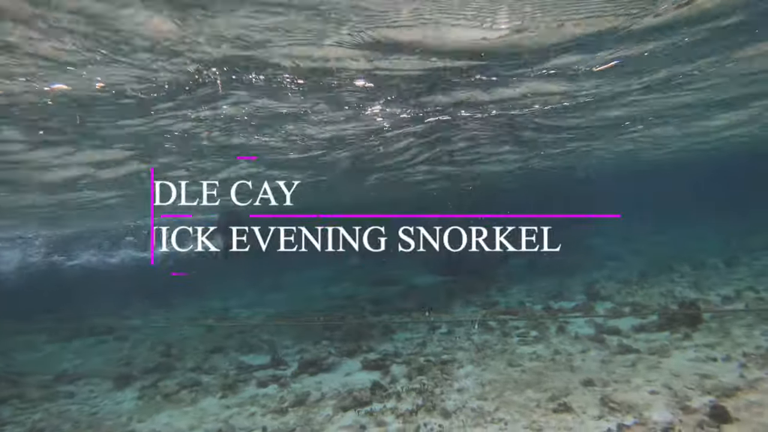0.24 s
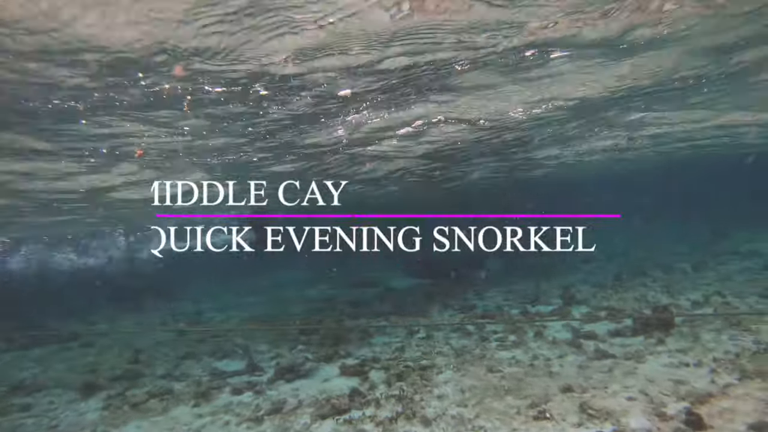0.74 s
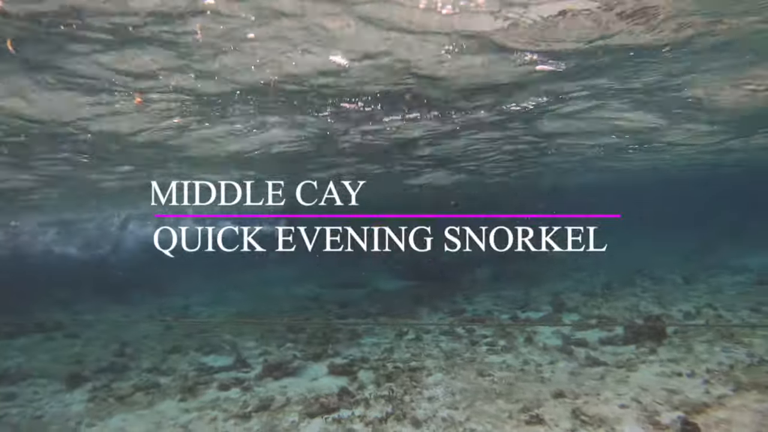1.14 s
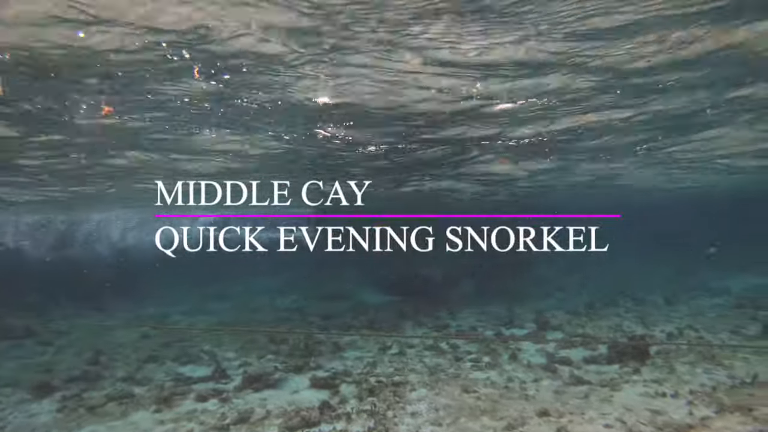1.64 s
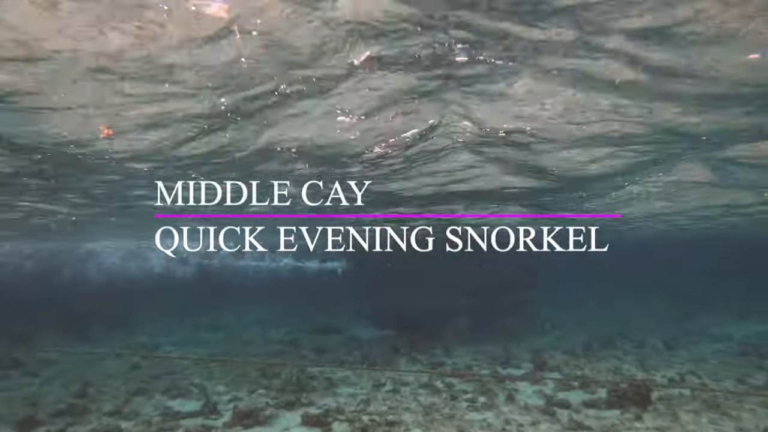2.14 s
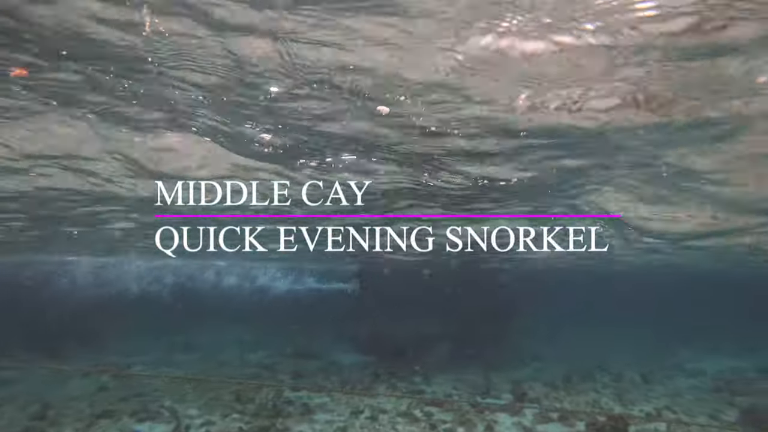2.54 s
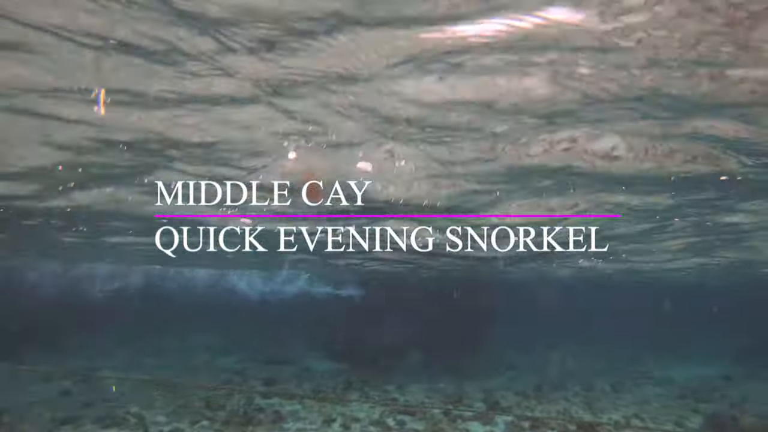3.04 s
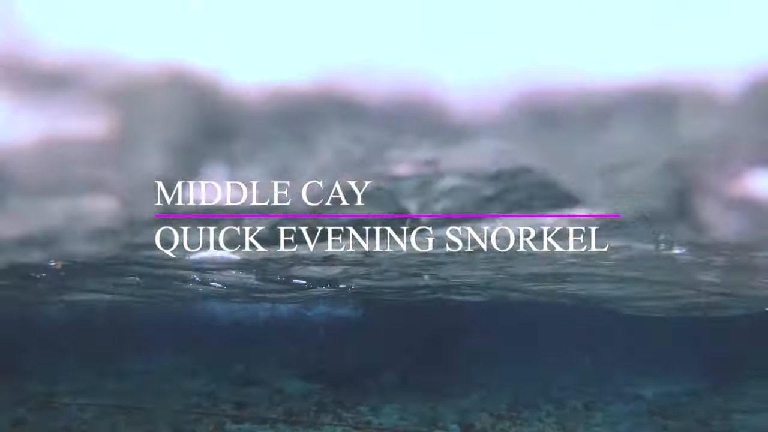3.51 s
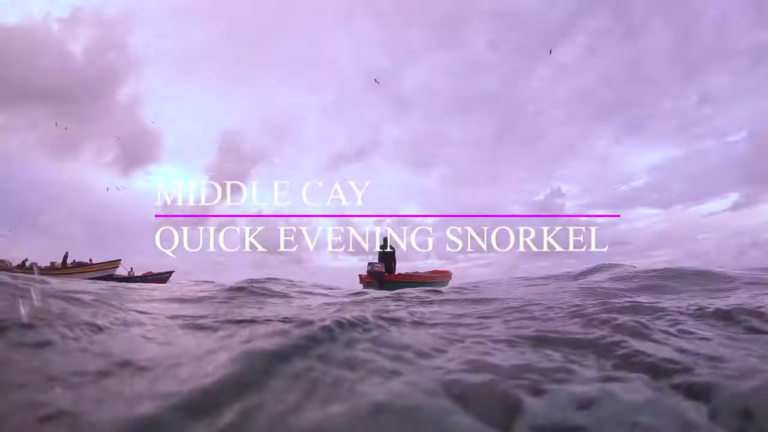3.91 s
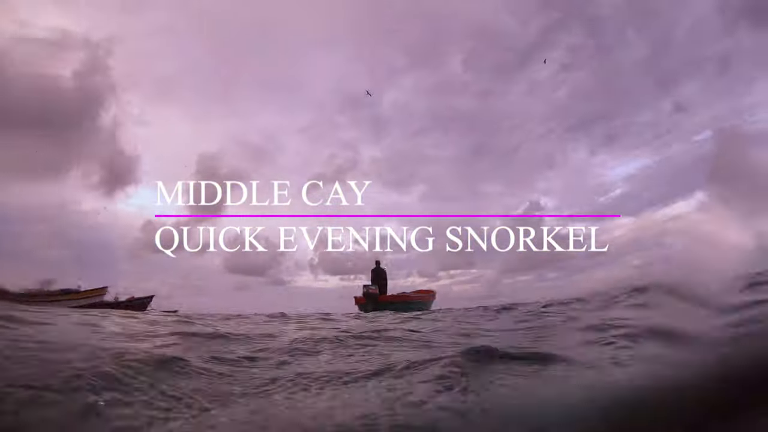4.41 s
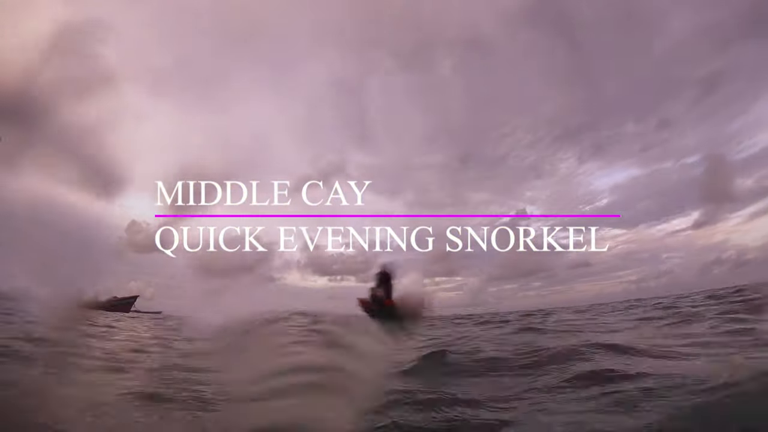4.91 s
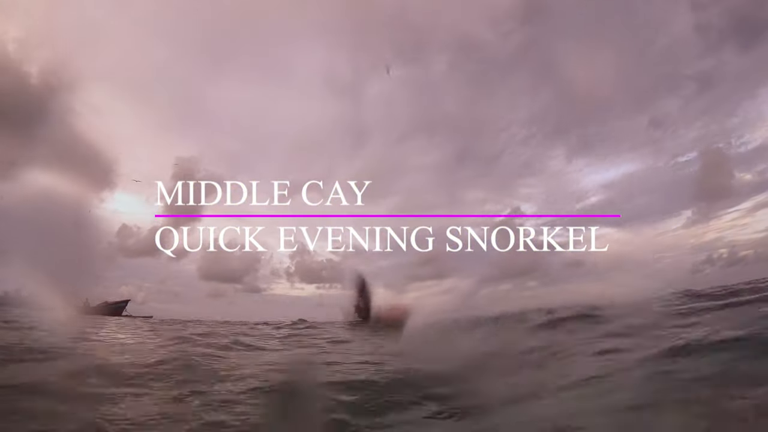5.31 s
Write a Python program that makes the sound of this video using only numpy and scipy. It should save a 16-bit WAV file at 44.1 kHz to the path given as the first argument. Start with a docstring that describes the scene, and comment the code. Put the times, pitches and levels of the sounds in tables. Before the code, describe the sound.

Uneven underwater rattle of an idling boat motor gives way to a gurgling splash, lapping water and hollow putting.

```python
"""Under water beside a small outboard motor, in a camera housing whose ringing pitches shift and waver.
The motor idles unevenly: each firing blows exhaust bubbles whose collapse excites the housing's modes.
The camera rises and breaks the surface: air gurgles out of the housing, water slaps, drips and thuds
on it and its two microphone ports, and the motor putts on through the air, ringing its exhaust pipe."""
import sys
import numpy as np
from scipy import signal
from scipy.fft import rfft, irfft, next_fast_len
from scipy.io import wavfile
from scipy.ndimage import uniform_filter1d, map_coordinates

SR = 44100
rng = np.random.default_rng(int(sys.argv[2]) if len(sys.argv) > 2 else 0)


def write(x):
    x = np.atleast_2d(x).T
    wavfile.write(sys.argv[1], SR, np.round(np.clip(x, -1, 1) * 32767).astype(np.int16))


N = 245151
TIME = np.arange(N) / SR
SURFACE_S = 3.177  # the housing breaks the surface


def amp(db):
    """Amplitude ratio of a level in dB."""
    return 10 ** (np.asarray(db) / 20)


def unit(x):
    """Normalisation to rms 1."""
    return x / np.sqrt(np.mean(x ** 2) + 1e-20)


def curves(rows):
    """Linear interpolation to one value per sample, for each column after the time."""
    s, *cols = np.transpose(rows)
    return [np.interp(TIME, s, c) for c in cols]


def wobble(rate):
    """Smooth random modulation, rate knots a second."""
    return map_coordinates(rng.standard_normal(int(N * rate / SR) + 4), [TIME * rate])


def filtered(x, response):
    """Linear filtering at unit power gain, so only relative levels in the response count."""
    m = next_fast_len(N + SR // 2)
    h = response(np.fft.rfftfreq(m, 1 / SR))
    return irfft(rfft(x, m) * unit(np.abs(h)) * np.exp(1j * np.angle(h)), m)[..., :N]


def modes(table):
    """Modal superposition of squared resonances; neighbours oppose, which darkens the valleys."""
    return lambda f: sum((-1) ** k * amp(db) * (1j * f * w / (c * c - f * f + 1j * f * w)) ** 2
                         for k, (c, w, db) in enumerate(table))


def colour(points):
    """Spectral envelope through (frequency [Hz], level [dB]) points on a log axis."""
    hz, db = np.transpose(points)
    return lambda f: amp(np.interp(np.log(f + 1), np.log(hz + 1), db))


def noise(side_spectrum):
    """Partly coherent stereo noise: a white sum and a difference with the given spectrum."""
    m = next_fast_len(N)
    mid, side = rng.standard_normal((2, m))
    side = irfft(rfft(side) * colour(side_spectrum)(np.fft.rfftfreq(m, 1 / SR)), m)
    return np.array([mid + side, mid - side])[:, :N]


def patchy(x, db, bins, frames):
    """Random spectral modulation: the colour changes in patches of frequency and time."""
    z = signal.stft(x, nperseg=256)[2]
    field = uniform_filter1d(rng.standard_normal(z.shape[1:]), size=bins, axis=0)
    field = uniform_filter1d(field, size=frames, axis=1)
    return unit(signal.istft(z * amp(db * unit(field)), nperseg=256)[1][:, :N])


def bursts(times, db, rise, t60, delay=0):
    """Incoherent addition: envelopes jump up at each time and decay, and their energies add."""
    t = np.arange(SR // 4) / SR
    energy = np.bincount(((times + delay) * SR).astype(int).clip(0), amp(db) ** 2, N)[:N]
    shape = amp(-60 * t / t60) * (1 - np.exp(-t / rise))
    return np.sqrt(np.abs(signal.fftconvolve(energy, shape ** 2)[:N]))


def kicks(times, db):
    """A train of pressure impulses."""
    return np.bincount((times * SR).astype(int).clip(0), amp(db), N)[:N]


def sides(db):
    """Left and right gains of a level difference."""
    return amp(np.array([db, -db]) / 2)


def shifting(x, tables, times, wander):
    """Equal-power crossfade from one set of modes to the next, wandering between them."""
    stage = np.interp(TIME, times, np.arange(len(tables))) + wander * wobble(14)
    stage = stage.clip(0, len(tables) - 1)
    return sum(np.sqrt(np.clip(1 - np.abs(stage - k), 0, 1)) * filtered(x, modes(table))
               for k, table in enumerate(tables))


# Strong firings; the last three columns are relative to the crackle:
# (time [s], crackle [dB], thump [dB], second clack [dB], brightness [dB])
FIRINGS = [(0.0206, -13.5, -3.5, 1.5, 6.5), (0.048, -12.5, -1.5, 2.5, -6), (0.079, -25, 7, 2, 3),
           (0.1063, -18, -20, 4.5, -12), (0.208, -16.5, -9, 2.5, -3), (0.2376, -13, 0, 5, -1.5),
           (0.269, -16.5, -5, 0.5, -7), (0.3292, -13.5, -1, 4, -7), (0.3613, -17, -17, -2.5, 3),
           (0.4221, -18, 1.5, 0.5, 1.5), (0.4564, -19.5, -8, -1, -6), (0.523, -16, -0.5, 4, 1),
           (0.556, -20, -9, 0.5, 2.5), (0.616, -11.5, -3, -6, 8), (0.6716, -22.5, -9, 3, 2),
           (0.7016, -15.5, -3, -11.5, 10.5), (0.7271, -22.5, -9, 3, 8), (0.844, -12, -7, -5.5, 6),
           (0.8886, -21, 0, -13, -0.5), (0.9246, -16.5, -3, 3.5, -3), (0.9543, -18, -12, -1.5, 3),
           (1.0008, -26, -17, 8, -6), (1.07, -17.5, -2.5, 1, 0), (1.106, -21.5, -2, -1, 2.5),
           (1.165, -16.5, -6, -2.5, 5), (1.1926, -17, -8, -13.5, 1.5), (1.3121, -17, -25, -12, 3.5),
           (1.342, -12.5, -7, -5, 0.5), (1.4259, -16.5, 1.5, 1.5, 0.5), (1.4627, -16, -34, -5.5, 0.5),
           (1.5158, -17, -2, -1, 4), (1.544, -15, -6, -18, -1.5), (1.6665, -14.5, -7.5, -1, 6),
           (1.7501, -15.5, -11, -3.5, -0.5), (1.775, -20, -27, -8, 3), (1.8941, -17, -5, 0, 1.5),
           (1.9814, -18.5, -3.5, -4, 8.5), (2.098, -22, -9, -1.5, -8), (2.131, -18, -8, 1, 3.5),
           (2.2159, -22, -11, 1, 7.5), (2.2426, -26, -2, 0.5, 5.5), (2.2941, -23.5, -6, -15, 2),
           (2.3578, -18, -7, 0.5, 2.5), (2.39, -19.5, -9, -14.5, 4), (2.4491, -22.5, 0, 0.5, 12),
           (2.476, -19.5, -8, -9.5, 1.5), (2.5372, -17.5, -7, -18, -1), (2.596, -24, -4, -10, 1),
           (2.6269, -20, -0.5, 1, 3), (2.662, -24, -1, -8, 3.5), (2.719, -16, -7.5, -1.5, 8.5),
           (2.8, -20.5, -5, -6, -1), (2.92, -27, -36, -16, 9), (2.985, -23.5, -3.5, -2, 10.5),
           (3.0723, -24, -4.5, -1, 9), (3.29, -38.5, 7, 5, 18), (3.3814, -32, -13, 2, 6.5)]
TURN_S, TURN_SCATTER_S = 0.025, 0.0016  # one turn of the crank


def firings():
    """Quasi-periodic excitation: up to four weaker firings follow each strong one, a turn apart."""
    s, db, thump_db, second_db = np.transpose(FIRINGS)[:4]
    turn = np.arange(1, 5)
    late, size = np.moveaxis(rng.standard_normal((len(s), len(turn), 2)), 2, 0)
    weak_s = s[:, None] + TURN_S * turn + TURN_SCATTER_S * late
    weak_db = db[:, None] - 9 - 1.5 * (turn - 1) + 3 * size
    next_strong_s = np.append(s[1:], s[-1] + 3 * TURN_S)
    free = s[:, None] + TURN_S * (turn + .5) < next_strong_s[:, None]
    return (np.append(s, weak_s[free]), np.append(db, weak_db[free]),
            np.append(thump_db, np.full(free.sum(), -6.5)),
            np.append(second_db, np.full(free.sum(), -4)))


def brightened(x, above_hz=2870, decay_s=0.027):
    """Modal balance: each strong firing excites the upper resonances more or less than the lower."""
    s, bright_db = np.transpose(FIRINGS)[[0, 4]]
    last = (np.searchsorted(s, TIME + 0.0034) - 1).clip(0)
    gain = amp(bright_db[last] * np.exp(-np.abs(TIME - s[last]) / decay_s))
    upper = signal.sosfiltfilt(signal.butter(2, above_hz, "high", fs=SR, output="sos"), x)
    return x + (uniform_filter1d(gain, size=40) - 1) * upper


# Housing modes, deep, midway and near the surface: (frequency [Hz], bandwidth [Hz], level [dB])
DEEP_MODES = [(1292, 39, -10), (1512.5, 93, 5.5), (1730, 280, -18), (1970, 99, -14), (2120, 115, -6),
              (2402, 210, -15), (2645, 110, -18.5), (2820, 160, -17), (3140, 303, -13.5),
              (4110, 290, -25.5), (4500, 260, -24), (4910, 220, -25), (5500, 480, -38)]
MIDWAY_MODES = [(1325, 42, -13.5), (1578, 71, 2), (1916, 170, -23), (2223, 153, -5.5), (2743, 170, -13.5),
                (2933, 170, -7.5), (3213, 264, -12.5), (4060, 210, -28.5), (4490, 130, -20.5),
                (5780, 110, -35)]
SHALLOW_MODES = [(1098, 72, -5), (1529, 95, 11), (1754, 108, 3), (2053, 310, -6), (2427, 130, -1),
                 (2685, 173, -0.5), (3208, 435, -4.5), (4160, 400, -17.5), (4807, 270, -16.5),
                 (5615, 530, -26.5)]
# Transmission of the wall above its resonances: (frequency [Hz], level [dB])
WALL_TREBLE = [(4500, -15), (5800, -8), (8000, -10), (15000, -24)]
# Incoherent difference of the motor's sound at the ports, against the sum: (frequency [Hz], level [dB])
MOTOR_SIDE = [(60, -6), (300, -33.5), (900, -1.5), (3310, -8.5)]


def crackle(s, db, second_db, churn):
    """Bubble collapse excites the housing's modes; every firing clacks twice."""
    second_s = s + 0.0094 + 0.0008 * rng.standard_normal(len(s))
    clack_s, clack_db = np.append(s, second_s), np.append(db, db + second_db)
    snap = bursts(clack_s, clack_db - 6.5, rise=0.00053, t60=0.041, delay=-0.0012)  # sudden collapse
    edge = bursts(s, db - 19, rise=0.00051, t60=0.013)  # a faint, very short fizz on each attack
    clumps = amp(2.5 * np.tanh(wobble(300)))
    strength = clumps * np.sqrt(snap ** 2 + edge ** 2 + churn ** 2)
    knock = 4.5 * kicks(clack_s - .0007, clack_db) * np.array([[.75], [1]])  # the firing itself
    drive = strength * patchy(noise(MOTOR_SIDE), 2.0, bins=3, frames=7) + knock
    ring = shifting(drive, [DEEP_MODES, MIDWAY_MODES, SHALLOW_MODES], (0.66, 1.55, 2.2), wander=0.3)
    sizzle = amp(-30) * filtered(strength * noise(MOTOR_SIDE), colour(WALL_TREBLE))
    return brightened(ring + sizzle)


# Response of the housing's body: (frequency [Hz], level [dB])
BODY_SPECTRUM = [(100, -7), (170, -0.5), (241, -7.5), (323, -23.5), (451, -28), (499, -5), (570, 9),
                 (657, 4.5), (1180, -22), (1620, -35.5), (2750, -120)]


def housing_body(s, db, churn):
    """Forced vibration: the housing's body answers each firing and hums with the churn."""
    envelope = np.hypot(bursts(s, db, rise=0.0045, t60=0.063, delay=0.0071), churn)
    drive = noise(MOTOR_SIDE) * envelope + 5 * kicks(s + 0.00591, db)
    return filtered(drive, colour(BODY_SPECTRUM))


# Exhaust bubble modes, an early and a lower late set: (frequency [Hz], bandwidth [Hz], level [dB])
THUMP_MODES = [
    [(127.5, 61, -11), (144.6, 19.3, 5.5)],
    [(119, 30.7, 0.5), (160.4, 35, -6.5)],
]


def thump(s, db, churn):
    """Bubble pulsation: the exhaust gives a low thump just after each firing."""
    push = 14 * kicks(s + 0.0102, db) + churn * noise([(100, -33)])
    return shifting(push, THUMP_MODES, times=(0.89, 1.1), wander=0.84)


# Paths to the ports: (frequency [Hz], left minus right [dB], phase lead of the left [rad])
WALL_PATHS = [(600, -0.2, -0.027), (1550, -4.5, -0.098), (2200, 1, -0.34), (3100, -1, -0.43), (4500, -1, 1)]


def through_walls(x):
    """Transmission through a different wall to each port gives differences of level and phase."""
    m = next_fast_len(N)
    hz = np.fft.rfftfreq(m, 1 / SR)
    f, db, lead = np.transpose(WALL_PATHS)
    gain = sides(np.interp(hz, f, db)) * np.exp(.5j * np.outer([1, -1], np.interp(hz, f, lead)))
    return irfft(rfft(x, m) * gain / np.abs(gain.mean(0)), m)[:, :N]


# Churn of the exhaust between firings: (time [s], crackle [dB], body [dB], thump [dB])
CHURN = [(0.0, -35, -37, -31), (2.47, -40, -41, -48.5), (3.6, -47.5, -51.5, -39.5)]


def motor_under_water():
    """Waterborne sound: each firing gives a crackle, the ring of the housing's body, then a thump."""
    s, db, thump_db, second_db = firings()
    body_db = db - 6 + 4 * wobble(39.8)[(s * SR).astype(int)]
    submerged = np.clip((SURFACE_S + 0.43 - TIME) / 0.2, 0, 1)
    hiss, hum, low = submerged * amp(curves(CHURN))
    housing = crackle(s, db, second_db, hiss) + housing_body(s, body_db, hum)
    return through_walls(housing) + thump(s, db + thump_db, low)


# Water moving on the ports: (time [s], rumble [dB], slosh [dB])
FLOW = [(0, -46.5, -85), (1.2, -42, -66), (3.3, -45, -76), (3.35, -38.5, -33), (3.6, -34, -37),
        (3.75, -34, -46.5), (4.0, -38.5, -46.5), (4.25, -34, -40.5), (4.5, -38, -45.5), (5.0, -41.5, -50.5),
        (5.3, -30.5, -42.5), (5.56, -35, -47.5)]
# Short surges on the submerged ports: (time [s], level [dB])
SURGES = [(2.088, -36), (2.48, -40), (2.558, -36.5)]
# Spectra of the flow: (frequency [Hz], level [dB])
RUMBLE_SPECTRUM = [(15, -15), (27, -12), (43, -4), (81, -9.5), (110, -5), (140, -9), (240, -120)]
SLOSH_SPECTRUM = [(60, -21.5), (150, -3), (250, -3), (450, -7), (700, -26.5), (2000, -54.5)]


def water_flow():
    """Flow noise: rumble and lumpy slosh differ from port to port; surges lift both."""
    rumble_db, slosh_db = curves(FLOW)
    surge = bursts(*np.transpose(SURGES), rise=0.0023, t60=0.32)
    rumble = filtered(noise([(40, -6.5)]), colour(RUMBLE_SPECTRUM))
    slosh = filtered(noise([(250, -3)]) * amp(5.4 * wobble(50)), colour(SLOSH_SPECTRUM))
    return np.hypot(amp(rumble_db), amp(6.5) * surge) * rumble + np.hypot(amp(slosh_db), surge) * slosh


def bubble_tones(rows, attack, rough, splash_db=-12.5):
    """Damped oscillators that glide and quiver; rows as in DRIPS, plus left minus right [dB]."""
    out, t = np.zeros((2, N + SR)), np.arange(SR // 8) / SR
    quiver, size = np.pad(wobble(150), (0, SR)), np.pad(wobble(200), (0, SR))
    for s, db, hz, glide, t60, pan_db in rows:
        at = slice(round(s * SR), round(s * SR) + len(t))
        bend = 1 + glide * np.minimum(2 * t / t60, 1) + 0.056 * rough * quiver[at]
        phase = 2 * np.pi * hz * np.cumsum(bend) / SR
        flutter = 1 + rough * size[at] * np.minimum(t / 0.0063, 1)
        ring = amp(db - 60 * (t / t60) ** 1.018) * flutter * np.sin(phase)
        # water torn open around the bubble: a band of noise at its pitch
        torn = signal.fftconvolve(rng.standard_normal((2, len(t))), [np.hanning(70)], "same", axes=1)
        band = (unit(torn) * [np.sin(phase), np.cos(phase)]).sum(0)
        splash = amp(db + splash_db - 60 * t / 0.036) * band
        onset = (1 - np.exp(-t / attack)) ** 2
        out[:, at] += sides(pan_db)[:, None] / sides(pan_db).mean() * (ring + splash) * onset
    return out[:, :N]


# Bubbles and drips: (time [s], level [dB], frequency [Hz], glide [fraction], decay by 60 dB [s])
DRIPS = [(2.503, -29, 333, -0.73, 0.092), (2.573, -22, 588, -0.15, 0.17), (2.699, -23, 400, 0.059, 0.03),
         (3.334, -20.5, 1026, 0.064, 0.015), (3.352, -24, 630, 0.057, 0.045),
         (3.456, -24, 2480, -0.12, 0.036), (3.472, -17, 637, 0.19, 0.064),
         (3.582, -22.5, 663, -0.043, 0.045), (3.623, -23, 663, 0.16, 0.08),
         (3.741, -28.5, 700, -0.041, 0.073), (3.969, -12.5, 1780, 0.54, 0.0055),
         (4.134, -26.5, 3290, -0.014, 0.024), (4.159, -28.5, 3180, 0.0021, 0.022),
         (4.183, -28, 724, 0.057, 0.097), (4.262, -10.5, 1635, -0.33, 0.0356),
         (4.279, -17.5, 1365, -0.15, 0.043), (4.276, -15, 3140, 0.22, 0.02),
         (4.371, -45, 8100, -0.026, 0.093), (4.468, -21, 836, 0.015, 0.11), (5.24, -29, 829, 0.053, 0.075),
         (5.291, -3, 1920, -0.12, 0.0096), (5.317, -18, 1113, 0.24, 0.013), (5.3295, 1.5, 1680, 0.1, 0.012),
         (5.347, -29, 2300, 0.01, 0.036), (5.366, -36, 1460, 0.5, 0.043)]
DRAINED_S, FILM_PAN_DB = 3.7, 22  # from surfacing until the ports drain, a drip is heard on one of them


def drips(droplets=8, spread_octaves=0.8, left_db=0.5):
    """Bubble resonance: each drip rings, then droplets spatter back at nearby pitches."""
    late, pitch, size = np.moveaxis(rng.random((len(DRIPS), droplets, 3)), 2, 0)
    s, db, hz = np.transpose(DRIPS)[:3, :, None]
    spatter_s = s + 0.014 * (0.44 + late)
    spatter_db = db - 31 - 6 * size - 8 * late
    spatter_hz = hz * 2 ** (spread_octaves * (2 * pitch - 1))
    spatter = [(*row, .15, 0.012, left_db)
               for row in zip(spatter_s.ravel(), spatter_db.ravel(), spatter_hz.ravel())]
    draining = (s > SURFACE_S) & (s < DRAINED_S)
    pan_db = np.where(draining, FILM_PAN_DB * np.sign(pitch[:, :1] - .5), left_db).ravel()
    drops = [(*drip, pan) for drip, pan in zip(DRIPS, pan_db)]
    return bubble_tones(drops + spatter, attack=0.00046, rough=0.25, splash_db=-19)


# Wash between spurts: (time [s], low band [dB], ring [dB], spray [dB])
WASH_LEVELS = [(3.4, -40.5, -54.5, -94), (4.0, -56, -54.5, -96), (4.08, -64, -65, -100),
               (4.6, -57.5, -67.5, -74), (4.78, -56, -73.5, -89), (5.56, -52, -63, -94.5)]
# Water spurting past the housing: (time [s], level [dB], relative spray level [dB])
SPURTS = [(4.108, -44, -32), (4.22, -46, -14.5), (4.349, -47.5, -13), (4.799, -54.5, -16), (5.17, -51, -30),
          (5.45, -63, -38)]
# Housing modes in air: (frequency [Hz], bandwidth [Hz], level [dB])
AIR_MODES = [(1870, 90, 10.5), (3104, 610, 9), (4670, 380, 2.5), (7280, 510, -13.5)]
# Spectra of the low band and the spray: (frequency [Hz], level [dB])
WASH_SPECTRUM = [(500, -10), (1700, -8.5), (2150, -10), (2600, -19.5), (4000, -34), (6000, -47.5)]
SPRAY_SPECTRUM = [(5000, -43), (6000, -3), (7300, 3), (10000, -1.5), (14000, -10.5)]


def wash(tick_spacing_s=0.022):
    """Modulated noise: the surface wash swells with each putt; wash and motor ticks ring the housing."""
    at, spurt_db, spray_db = np.transpose(SPURTS)
    spurts = [bursts(at, spurt_db + db, rise=0.013, t60=0.6) for db in (0, -3, spray_db)]
    low_gain, ring_gain, spray_gain = np.hypot(amp(curves(WASH_LEVELS)), spurts)
    putt_s, putt_db = np.transpose(PUTTS)[:2]
    swell = 1 + bursts(putt_s, putt_db + 31, rise=0.0012, t60=0.069)
    tick_s = np.arange(SURFACE_S, N / SR, tick_spacing_s)
    late, size = rng.standard_normal((2, N // 500))[:, :len(tick_s)]
    ticks = kicks(tick_s + 0.0046 * late, 26.5 + 4 * size)
    grain_db = 3 * wobble(22) + 3 * wobble(250)
    low_noise = swell * amp(grain_db) * patchy(noise([(1500, -8)]), 1.14, bins=3, frames=12)
    ring_noise = swell * amp(grain_db - 1.5) * patchy(noise([(3500, -22.5)]), 3.8, bins=4, frames=30)
    low = filtered(low_gain * low_noise, colour(WASH_SPECTRUM))
    ring = filtered(ring_gain * (ticks + ring_noise), modes(AIR_MODES))
    spray = filtered(spray_gain * amp(0.65 * grain_db) * noise([(8000, -15)]), colour(SPRAY_SPECTRUM))
    return np.clip((TIME - SURFACE_S) / 0.39, 0, 1) * (low + ring + spray)


# Air leaving the housing: (time [s], frequency [Hz], level [dB])
GURGLE = [(3.33, 425, -43), (3.385, 375.5, -30), (3.405, 330, -31), (3.425, 295, -21), (3.45, 213.6, -27),
          (3.51, 215, -22.5), (3.54, 177.8, -40), (3.6, 160.5, -27.5), (3.66, 152, -28.5), (3.8, 124, -34)]


def gurgle():
    """Cavity resonance: the cavity grows as air leaves, so its throbbing tone falls."""
    hz, db = curves(GURGLE)
    gate = uniform_filter1d(1.0 * ((TIME > GURGLE[0][0]) & (TIME < GURGLE[-1][0])), size=200)
    tone = np.sin(2 * np.pi * np.cumsum(hz * (1 + 0.077 * wobble(110))) / SR)
    throb = amp(db + 3.1 * np.tanh(wobble(90)))
    sway = sides(1.5)[:, None] + 1.3 * np.tanh(wobble(30)) * np.array([[1], [-1]])
    return gate * throb * tone * sway


def lapping_bubbles(count=220):
    """Constant-Q decay: small bubbles around the surfaced housing each lose 60 dB in about 30 cycles."""
    when, pitch, size, pan = rng.random((count, 4)).T
    hz = 500 * 6.5 ** pitch
    db = -46 + 11 * size ** 2 - 5 * np.log2(hz / 1000)
    s = SURFACE_S + 0.22 + when * (N / SR - SURFACE_S - .25)
    rows = zip(s, db, hz, np.full(count, 0.28), 30 / hz, 8 * (pan - .5))
    return bubble_tones(rows, attack=0.0018, rough=0.19)


# Water films breaking on the left port: (time [s], level [dB], rebound frequency [Hz])
THUDS = [(3.4473, -15, 147), (3.5164, -0.5, 75), (3.575, -7.5, 91), (3.676, -4, 79), (4.118, -14, 70.6),
         (4.157, -13.5, 70.4), (4.261, -11, 70), (4.375, -21, 75), (4.396, -17, 75)]


def thuds(rise_s=0.0005, t60=0.04):
    """Damped transient: a breaking film pushes the port's membrane inward, and it slowly rebounds."""
    out, t = np.zeros(N + SR), np.arange(SR // 10) / SR
    for s, db, hz in THUDS:
        envelope = amp(db - 60 * t / t60) * (1 - np.exp(-t / rise_s))
        out[round(s * SR):][:len(t)] -= envelope * np.cos(2 * np.pi * hz * t)
    return out[:N] * np.array([[1], [.12]])


def port_gain():
    """Occlusion: each thud blocks the ports for a moment, so their gain drops and recovers."""
    s, db = np.transpose(THUDS)[:2]
    return 1 / (1 + bursts(s, db + 4, rise=.004, t60=0.16, delay=0.0046))


# Water striking the housing: (time [s], level [dB], relative treble level [dB])
SLAPS = [(3.449, -34, -29), (3.515, -23.5, -20), (3.572, -30, -21), (3.674, -25, -19), (3.931, -30, -43),
         (3.9695, -22.5, -60), (4.2251, -32, -19), (4.2779, -18, -18.5), (4.31, -44, -38),
         (4.3422, -34.5, -21), (4.47, -43, -2), (4.503, -44.5, -6), (4.804, -24.5, -17), (4.831, -40, -12),
         (5.063, -38.5, -37), (5.1844, -33.5, -19), (5.252, -39, -10), (5.2762, -32, -40)]


def slaps(t60=0.011):
    """Impact noise: a short crack through the housing and a spray of treble."""
    out, t = np.zeros((2, 2, N + SR)), np.arange(SR // 20) / SR
    for s, db, treble_db in SLAPS:
        pan_db = -2 * rng.standard_normal()
        hiss = rng.standard_normal(len(t)) + 0.065 * rng.standard_normal((2, len(t)))
        crack = amp(db - 60 * t / t60) * hiss
        crack[:, 0] = 4 * amp(db)  # the first contact is one sharp click
        out[..., round(s * SR):][..., :len(t)] += [sides(pan_db)[:, None] * crack, amp(treble_db) * crack]
    crack, spray = out[..., :N]
    wall = colour([(200, -22.5), (800, -4), (2000, -5.5), (4500, -14.5), (6000, -30), (9000, -58)])
    return filtered(crack, wall) + filtered(spray, colour(SPRAY_SPECTRUM))


# Airborne putts: (time [s], level [dB], bubble frequency [Hz], bubble level [dB])
PUTTS = [(3.635, -28.5, 670, -39), (3.713, -29.5, 614, -41), (3.781, -34, 660, -35), (3.831, -44, 607, -38),
         (3.894, -29, 728, -24.5), (3.945, -27, 700, -39), (4.001, -30, 743, -55), (4.061, -28, 520, -36.5),
         (4.101, -28.5, 660, -36), (4.193, -28, 720, -47), (4.261, -28, 727, -23), (4.303, -28, 704, -34),
         (4.338, -30, 670, -37), (4.375, -25, 716, -34.5), (4.424, -31, 735, -43), (4.471, -35.5, 910, -46),
         (4.531, -26.5, 515, -34.5), (4.592, -26, 603, -61), (4.65, -26.5, 750, -34.5),
         (4.702, -30, 644, -30.5), (4.747, -25, 888, -54), (4.793, -28.5, 526, -36),
         (4.842, -28.5, 844, -37), (4.885, -28, 754, -46), (4.933, -29.5, 810, -56),
         (4.998, -26.5, 835, -34), (5.067, -25, 620, -45), (5.119, -23.5, 840, -34),
         (5.173, -27.5, 544, -36), (5.215, -30, 570, -46), (5.261, -24, 547, -30), (5.306, -28.5, 915, -42),
         (5.343, -29.5, 720, -58), (5.393, -30.5, 747, -35), (5.433, -27.5, 850, -35),
         (5.473, -25, 516, -42), (5.53, -28, 860, -44)]
# Boom relative to the putt: (time [s], level [dB])
BOOM_LEVELS = [(3.7, -31), (4.0, 2), (4.25, 2), (4.36, -14), (4.6, 1), (5.0, -11.5), (5.56, -5.5)]
# Modes of the exhaust pipe and of the boom: (frequency [Hz], bandwidth [Hz], level [dB])
PIPE_MODES = [(339.2, 32.2, 14), (415, 59, 4), (225, 224, -2.5)]
BOOM_MODES = [(78.6, 12.4, 8), (142, 53, -7)]


def motor_in_air():
    """Pipe resonance: each putt rings the exhaust, booms low and pops a bubble at the waterline."""
    s, db, pop_hz, pop_db = np.transpose(PUTTS)
    boom_db = db + np.interp(s, *np.transpose(BOOM_LEVELS))
    puff = 12 * kicks(s, db) + bursts(s, db - 1, rise=0.0022, t60=0.05) * noise([(300, -21)])
    boom = 20 * kicks(s, boom_db) + bursts(s, boom_db, rise=0.0088, t60=0.24) * noise([(80, -21)])
    rows = [(at, level, hz, .08, .07, 0) for at, level, hz in zip(s, pop_db, pop_hz)]
    pops = bubble_tones(rows, attack=0.0015, rough=0.088)
    return filtered(puff, modes(PIPE_MODES)) + filtered(boom, modes(BOOM_MODES)) + pops


def scene():
    """Superposition of all sources at the two ports."""
    splash = lapping_bubbles() + drips() + slaps() + thuds()
    occluded = port_gain() * (motor_under_water() + wash())
    return occluded + motor_in_air() + water_flow() + gurgle() + splash


def record(dry):
    """Mid-side mixing and low-pass filtering: stereo only in the middle stretch, with damped treble."""
    width = np.interp(TIME, (1.62, 2.1, 4.45, 4.56), [0, 1, 1, 0])
    mid, side = dry.mean(0), (dry[0] - dry[1]) / 2 * width
    dull = signal.sosfilt(signal.butter(2, 7000, fs=SR, output="sos"), [mid + side, mid - side])
    fade_out = np.clip((N / SR - TIME) / .004, 0, 1)
    return signal.sosfilt(signal.cheby2(10, 60, 15000, fs=SR, output="sos"), dull * fade_out)


dry = scene()
out = record(dry)
write(out)
```